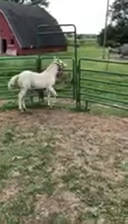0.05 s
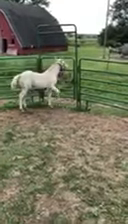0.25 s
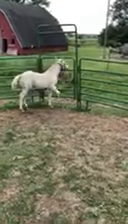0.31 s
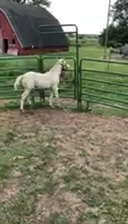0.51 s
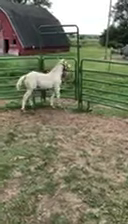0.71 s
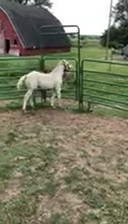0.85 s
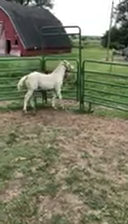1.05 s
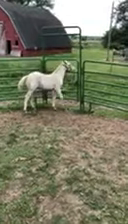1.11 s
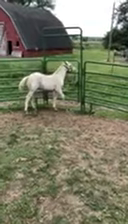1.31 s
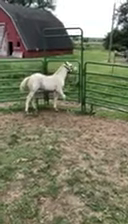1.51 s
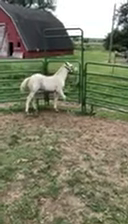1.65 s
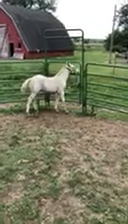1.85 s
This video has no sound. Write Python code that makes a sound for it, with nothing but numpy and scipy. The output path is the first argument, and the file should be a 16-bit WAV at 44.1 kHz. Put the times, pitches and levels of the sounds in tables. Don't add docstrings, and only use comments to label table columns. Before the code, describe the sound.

Hollow steel fencing is struck sharply early on, rattling with weaker touches and a humming decay, while crickets and buzzing insects chirr steadily outdoors; soft hoof steps and a small late clink, microphone some distance away.

```python
import sys
import numpy as np
from scipy import signal
from scipy.fft import rfft, irfft, next_fast_len
from scipy.io import wavfile
from scipy.ndimage import map_coordinates

SR = 44100
rng = np.random.default_rng(int(sys.argv[2]) if len(sys.argv) > 2 else 0)


def ratio_of_db(decibels):
    return 10 ** (np.asarray(decibels, float) / 20)


def file_out(sig):
    cols = np.atleast_2d(sig).T
    lim = np.clip(cols, -1, 1)
    pcm = np.round(lim * 32767).astype(np.int16)
    wavfile.write(sys.argv[1], SR, pcm)


N = 83790


def unit(x):
    return x / np.sqrt(np.mean(x ** 2) + 1e-20)


def along(points, hz):
    f, v = np.transpose(points)
    return np.interp(np.log(hz + 1), np.log(f + 1), v)


def wobble(rate):
    knots = rng.standard_normal(int(N * 40 / SR) + 4)
    coarse = map_coordinates(knots, [np.arange(N // 64 + 2) * 64 * rate / SR])
    return np.interp(np.arange(N) / 64, np.arange(len(coarse)), coarse)


def tint(x, spectrum):
    size = next_fast_len(len(x))
    hz = np.fft.rfftfreq(size, 1 / SR)
    inside = (hz >= spectrum[0][0]) & (hz <= spectrum[-1][0])
    return irfft(rfft(x, size) * ratio_of_db(along(spectrum, hz)) * inside, size)[:len(x)]


def coloured(x, spectrum):
    return unit(tint(x, spectrum))


def add(track, start_s, sound):
    part = track[round(start_s * SR):][:len(sound)]
    part += sound[:len(part)]


# pitch_hz [Hz], density_db [dB per Hz]
MURMUR_SPECTRUM = [(20, -6), (60, -3), (130, -2.5), (300, -8), (500, -11), (1600, -17.5), (3400, -23),
                   (4500, -9.5)]
# pitch_hz [Hz], density_db [dB per Hz]
GUST_SPECTRUM = [(35, -8.5), (70, 7.5), (150, 0), (300, -15.5)]
MURMUR_DB, GUST_DB = -66.5, -75.5


def air():
    gusts = unit(ratio_of_db(5.5 * wobble(9)) * coloured(rng.standard_normal(N), GUST_SPECTRUM))
    murmur_gain = ratio_of_db(MURMUR_DB + 0.15 * wobble(7.8))
    murmur = coloured(rng.standard_normal(N), MURMUR_SPECTRUM)
    return murmur_gain * murmur + ratio_of_db(GUST_DB) * gusts


# pitch_hz [Hz], density_db [dB per Hz]
BUZZ_SPECTRUM = [(6300, -50), (6550, -19.5), (7270, -9.5), (7690, 2), (8110, 3.5), (8960, -2), (9200, -17),
                 (10300, -33.5)]
# start_s [s], level_db [dB]
CHOIR = [
    (0.0, -58),
    (0.184, -59),
    (0.312, -67),
    (0.598, -58.5),
    (1.9, -58),
]
CLICKS_PER_S, CLICK_SHARE, SWELL_DB = 400, 0.39, -0.38


def katydids():
    turns = np.cumsum(CLICKS_PER_S * (1 + 0.23 * wobble(30))) / SR
    teeth = np.diff(np.floor(turns), prepend=0)
    clicks = unit(teeth * rng.standard_normal(N) * ratio_of_db(3 * wobble(12)))
    hiss = rng.standard_normal(N)
    buzz = coloured(np.sqrt(CLICK_SHARE) * clicks + np.sqrt(1 - CLICK_SHARE) * hiss, BUZZ_SPECTRUM)
    choir_db = np.interp(np.arange(N) / SR, *np.transpose(CHOIR))
    return ratio_of_db(choir_db + SWELL_DB * wobble(11.5)) * buzz


# centre_s [s], pitch_hz at the loudest [Hz], level_db [dB]
PULSES = [(.04, 4680, -56.5), (.083, 5000, -58), (.175, 5160, -62), (.59, 4570, -61), (.662, 4580, -63),
          (.7, 4700, -62.5), (.75, 4580, -60), (.812, 4860, -62.5), (.855, 4780, -58), (.9, 4970, -57.5),
          (.953, 4600, -63.5), (.986, 4510, -60.5), (1.14, 4850, -58), (1.168, 4640, -61),
          (1.215, 4610, -62.5), (1.268, 4800, -61), (1.315, 4690, -60.5), (1.355, 4880, -61),
          (1.487, 4550, -61), (1.52, 4750, -57.5), (1.568, 5230, -68), (1.615, 4800, -58),
          (1.632, 4500, -71), (1.675, 4800, -61.5), (1.725, 4960, -66), (1.74, 4500, -63),
          (1.78, 4390, -57.5), (1.794, 4620, -57.5), (1.893, 5050, -60)]
# pitch_hz [Hz], gain_db [dB]
WING_RESONANCE = [(3700, -25), (4200, 0), (5200, 6.5), (5400, -21), (5500, -55)]
# pitch_hz [Hz], density_db [dB per Hz]
HAZE_SPECTRUM = [(3700, -29.5), (4100, -8), (4700, 7.5), (5200, 0), (5400, -34), (5480, -61)]
FALL_HZ_PER_S, PULSE_S, TRAIL_S = 36000, 0.0052, 0.0065
CHORUS_DB, CHORUS_HZ, CHORUS_SPREAD_HZ, HAZE_DB = -75.5, 4800, 480, -62.5


def crickets(count=170):
    spread = rng.standard_normal((count, 2))
    start_s = rng.uniform(0, N / SR, count)
    far = np.c_[start_s, CHORUS_HZ + CHORUS_SPREAD_HZ * spread[:, 0], CHORUS_DB + 3 * spread[:, 1]]
    half = SR // 20
    out, t = np.zeros(N + SR // 10), np.arange(-half, half) / SR
    shape = np.exp(-.5 * (t / np.where(t < 0, PULSE_S, TRAIL_S)) ** 2)
    for s, hz, db in [*PULSES, *far]:
        tone = np.sin(2 * np.pi * (hz * t - FALL_HZ_PER_S * t * t / 2))
        add(out, s, ratio_of_db(db) * np.sqrt(2) * shape * tone)
    haze = ratio_of_db(HAZE_DB + 1.05 * wobble(21)) * coloured(rng.standard_normal(N), HAZE_SPECTRUM)
    return tint(out[half:][:N], WING_RESONANCE) + haze


HARD_S, SOFT_S, LINK_S = 0.0023, 0.0082, 0.003
SCATTER_DB = -2.2


def ring(hz, modes, times, blows_db, contacts, scatter_db):
    out, at = np.zeros(N), np.round(np.multiply(times, SR)).astype(int)
    chance = rng.standard_normal((len(at), 2, len(modes)))
    quarter = np.pi / 2 * (np.arange(len(at)) % 2)[:, None]
    chance[:, 1] = 2 * chance[0, 1] + .3 * chance[:, 1] + quarter
    for k, (db, t60) in enumerate(modes):
        push, turn = np.zeros(N + SR // 10, complex), 2j * np.pi * hz[k] / SR
        for a, blow_db, contact, (size, phase) in zip(at, blows_db, contacts, chance[:, :, k]):
            force = np.hanning(int(contact * SR) + 3)
            force /= force.sum()
            carrier = np.exp(turn * np.arange(a, a + len(force)) + 1j * phase)
            push[a:a + len(force)] += ratio_of_db(db + blow_db + scatter_db * size) * force * carrier
        span = slice(at[0], min(N, at[-1] + int(t60 * SR)))
        pole = np.exp(turn) * ratio_of_db(-60 / SR / t60)
        out[span] += signal.lfilter([1], [1, -pole], push[span]).imag
    return out


TWIN_HZ, TWIN_DB = 15.44, -8.5


def twinned(hz, modes):
    neighbours = hz + TWIN_HZ * rng.standard_normal(len(hz))
    return [*hz, *neighbours], [*modes, *np.add(modes, [TWIN_DB, 0])]


RISE_S = 0.00073


def burst(spectrum, t60):
    t = np.arange(SR // 4) / SR
    rasp = coloured(rng.standard_normal(len(t)), spectrum)
    return rasp * ratio_of_db(-60 * t / t60) * (1 - np.exp(-t / RISE_S))


# start_s [s], rail_db, post_db, panels_db, clatter_db [dB]
KNOCKS = [
    (0.2173, -31, -31.5, -48, -39),
    (.245, -42, -40.5, -58, -48.5),
    (.262, -44, -37, -74.5, -49),
    (0.389, -51.5, -59.5, -66, -51),
    (0.432, -54, -60.5, -65.5, -56),
    (.515, -58, -68.5, -82, -62.5),
    (0.724, -59.5, -67, -74, -65.5),
]
# level_db [dB], t60_s [s]; then pitch_hz [Hz]
RAIL_MODES = [(-25, 0.54), (-24, 0.33), (-13, 0.091), (-11, 0.97), (-19, 0.58), (-13.5, 0.81),
              (-10.5, 0.62), (-7, 0.22), (-21, 0.52), (-32.5, 0.21), (-23, .41), (-7.5, 0.33), (-2.5, 0.24),
              (-7.5, 0.21)]
RAIL_HZ = [3295, 4323, 5905, 1726, 1755, 1843, 2012, 2252, 2428, 2546, 2595, 2748, 2880, 2977]
POST_MODES = [(-11, 0.21), (-10, 0.29), (1.5, 0.36), (-13.5, 0.4), (-8, 0.47), (-12, 0.55), (-3.5, 0.37),
              (-10.5, 0.45), (-15, 0.46), (-12.5, 0.29), (-13.5, 0.43), (-4.5, 0.29), (-9.5, 0.41),
              (-18, 0.46)]
POST_HZ = [3229, 3381, 3588, 4118, 4815, 4949, 5108, 5211, 5373, 5555, 5752, 5991, 6014, 6325]
PANEL_MODES = [(-6, 1.9), (-3, 2.1), (-6.5, 1.92), (-8, 1.1), (-8, 2.26), (-1, 1.29), (2, 0.6), (-8.5, 2.3),
               (-8, 0.89), (-12, 1.5), (-2, 1.2), (-18.5, .8), (-15, 1), (-13, 1.3)]
PANEL_HZ = [1711, 1769, 1866, 1986, 2013, 2260, 2386, 2415, 2573, 2888, 3202, 3427, 3586, 2600]
# pitch_hz [Hz], level_db [dB]
CLATTER = [(1300, -22), (1620, -4.5), (1750, -15), (3300, -9.5), (3900, -5), (4600, -8), (5200, -7),
           (6400, -25.5)]
CRACK_DB, CRACK_T60_S = -23.5, 0.042
KNOCK_CONTACTS = [HARD_S] + [SOFT_S] * (len(KNOCKS) - 1)


def panel_knocks():
    start_s, rail_db, post_db, panels_db, _ = np.transpose(KNOCKS)
    bodies = [(RAIL_HZ, RAIL_MODES, rail_db), (POST_HZ, POST_MODES, post_db),
              (PANEL_HZ, PANEL_MODES, panels_db)]
    out = np.zeros(N)
    for hz, modes, db in bodies:
        out += ring(*twinned(hz, modes), start_s, db, KNOCK_CONTACTS, SCATTER_DB)
    add(out, start_s[0], ratio_of_db(CRACK_DB) * burst(CLATTER, CRACK_T60_S))
    return out


# pitch_hz [Hz], t60_s [s]
CLATTER_T60 = [(1300, 0.85), (1800, 0.76), (3500, 0.28), (6400, 0.68)]
KIN_HZ = 45


def weak_modes(count=76):
    strong = [*RAIL_HZ[3:], *POST_HZ, *PANEL_HZ]
    hz = np.resize(strong, count) + KIN_HZ * rng.standard_normal(count)
    t60 = along(CLATTER_T60, hz) * ratio_of_db(rng.uniform(-4, 1, count))
    return hz, np.c_[along(CLATTER, hz), t60]


# start_s [s], ring_db, clatter_db [dB]
NUDGES = [
    (1.79, -71, -77),
    (1.812, -58, -65.5),
    (1.821, -55, -61.5),
    (1.845, -66, -68),
    (1.868, -64, -74),
]


def clatter(hz, swarm):
    knock_s, *_, knock_db = np.transpose(KNOCKS)
    nudge_s, _, nudge_db = np.transpose(NUDGES)
    out = ring(hz, swarm, knock_s, knock_db, KNOCK_CONTACTS, scatter_db=2.5)
    return out + ring(hz, swarm, nudge_s, nudge_db, [SOFT_S] * len(NUDGES), scatter_db=6.0)


# start_s [s], frame_db, thud_db [dB]
THUDS = [
    (.2173, -43, -48),
    (.24, -64, -57.5),
    (.262, -52.5, -66),
    (.39, -62, -60),
    (.42, -60.5, -71),
    (.515, -68, -63),
    (.712, -71.5, -64.5),
    (.735, -72, -70),
]
# level_db [dB], t60_s [s]; then pitch_hz [Hz]
FRAME_MODES = [(-7, .17), (-16, .2), (-10, .18), (-14, .3), (-9, .1), (-12, .18), (-13, .2), (0, .28),
               (-14, .4), (-1, .15), (-10, .5)]
FRAME_HZ = [530, 705, 802, 953, 1030, 1163, 1222, 1362, 1437, 1515, 1620]
# pitch_hz [Hz], density_db [dB per Hz]
THUD_SPECTRUM = [(380, -1.5), (550, -1), (1000, 4), (1600, 4)]
THUD_T60_S = 0.24


def frame_thuds():
    start_s, frame_db, thud_db = np.transpose(THUDS)
    out = ring(*twinned(FRAME_HZ, FRAME_MODES), start_s, frame_db, [LINK_S] * len(THUDS), scatter_db=1.5)
    for at, db in zip(start_s, thud_db):
        add(out, at, ratio_of_db(db) * burst(THUD_SPECTRUM, THUD_T60_S))
    return out


# start_s [s], links_db, hook_db, tick_db [dB]
JINGLES = [(0.218, -54, -64, -39.5), (0.238, -63, -62, -54), (.263, -49, -49.5, -45),
           (0.294, -53, -56.5, -48), (0.336, -60.5, -65, -56), (.422, -51.5, -67, -51.5),
           (.458, -58.5, -75, -56), (.917, -76, -51.5, -74), (.945, -84, -54, -66), (.997, -87, -61.5, -81),
           (1.1, -85, -68.5, -78)]
# level_db [dB], t60_s [s]; then pitch_hz [Hz]
LINK_MODES = [(-7, .25), (-4, .22), (-4, .25), (-4, .25), (-5, .25), (-7, .3), (0, .16), (-1, .16),
              (-10, .45), (-12, .35)]
LINK_HZ = [7564, 7903, 8043, 8215, 8457, 8748, 9092, 9250, 9405, 9787]
HOOK_MODES = [(-6, .2), (-6, .6), (-6, .2), (-9, .7), (-8, .8), (-8, .3), (-4, .45), (-4, 1.1), (3, .1)]
HOOK_HZ = [7617, 7913, 7962, 8048, 8215, 8280, 8463, 8615, 8818]
# pitch_hz [Hz], density_db [dB per Hz]
TICK_SPECTRUM = [(6300, -13.5), (7200, -4), (8800, -7), (9800, -10.5), (10400, -35)]
TICK_T60_S = 0.13


def chain_jingles():
    start_s, links_db, hook_db, tick_db = np.transpose(JINGLES)
    touch = [LINK_S] * len(JINGLES)
    out = ring(*twinned(LINK_HZ, LINK_MODES), start_s, links_db, touch, scatter_db=4.0)
    out += ring(HOOK_HZ, HOOK_MODES, start_s, hook_db, touch, scatter_db=4.5)
    for at, db in zip(start_s, tick_db):
        add(out, at, ratio_of_db(db) * burst(TICK_SPECTRUM, TICK_T60_S))
    return out


# start_s [s], level_db [dB]
PIN_TAPS = [
    (0.698, -76),
    (0.726, -93),
    (.92, -81.5),
    (1.605, -84),
    (1.785, -75),
    (1.82, -64),
]
# level_db [dB], t60_s [s]; then pitch_hz [Hz]
PIN_MODES = [(-4, 0.45), (3, 0.29), (-12, 0.28), (1, 0.18), (-3.5, 0.29)]
PIN_HZ = [5373, 5553, 5755, 6013, 6257]


def pin_taps():
    return ring(PIN_HZ, PIN_MODES, *np.transpose(PIN_TAPS), [SOFT_S] * len(PIN_TAPS), scatter_db=5.5)


# level_db [dB], t60_s [s]; then pitch_hz [Hz]
REBOUND_MODES = [(-7.5, 0.24), (-2, .2), (-8, .2), (-3, 0.46), (-9, 0.33), (1, 0.41)]
REBOUND_HZ = [1240, 2530, 2692, 2848, 3230, 3585]
REBOUND_S, REBOUND_DB = .727, -60


def rail_rebound():
    return ring(REBOUND_HZ, REBOUND_MODES, [REBOUND_S], [REBOUND_DB], [SOFT_S], SCATTER_DB)


# start_s [s], level_db [dB]
HOOFS = [
    (0.925, -54.5),
    (1.04, -57.5),
    (1.311, -53.5),
]
HOOF_HZ, HOOF_S = 79, 0.0061


def hoofs():
    out, t = np.zeros(N), np.arange(SR // 8) / SR
    push = np.e * t / HOOF_S * np.exp(-t / HOOF_S) * np.sin(2 * np.pi * HOOF_HZ * t)
    for start_s, db in HOOFS:
        add(out, start_s, ratio_of_db(db) * push)
    return out


# level_db [dB], t60_s [s]; then pitch_hz [Hz]
GATE_MODES = [(-13.5, .6), (-12.5, 0.51), (-7, 0.27), (-13, 0.32), (-7, 0.32), (-0.5, 0.26), (-5.5, .5),
              (-6, 0.16), (-10, .3), (1.5, 0.16), (-9, .2), (-4, 0.23), (-5.5, 0.23), (-9, 0.22)]
GATE_HZ = [947, 1077, 1346, 1610, 1760, 1884, 2003, 2557, 2729, 2930, 3203, 3585, 4054, 5023]


def gate_nudges():
    start_s, ring_db, _ = np.transpose(NUDGES)
    return ring(*twinned(GATE_HZ, GATE_MODES), start_s, ring_db, [SOFT_S] * len(NUDGES), SCATTER_DB)


# pitch_hz [Hz], t60_s [s]
YARD_T60 = [(300, 0.23), (3000, 0.25), (9000, .2)]
YARD_DB = -15


def yard(dry_steel):
    size = SR // 2
    hz, t, z = signal.stft(rng.standard_normal(size), SR, nperseg=128)
    decay = ratio_of_db(-60 * t / along(YARD_T60, hz)[:, None])
    tail = signal.istft(z * decay, SR, nperseg=128)[1][:size]
    delayed = np.pad(dry_steel, (600, 0))
    return ratio_of_db(YARD_DB) * signal.fftconvolve(delayed, tail / np.linalg.norm(tail))[:N]


def scene():
    hz, swarm = weak_modes()
    steel = panel_knocks() + frame_thuds() + pin_taps() + rail_rebound()
    steel += gate_nudges() + clatter(hz, swarm)
    steel += chain_jingles()
    return (steel + yard(steel) + crickets() + katydids() + hoofs() + air())[None]


def top_cut(x):
    return signal.sosfilt(signal.butter(12, 10760, fs=SR, output="sos"), x)


def record(dry):
    return top_cut(dry)


dry = scene()
out = record(dry)
file_out(out)
```